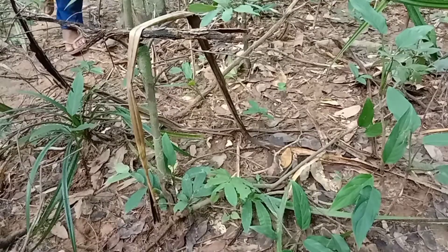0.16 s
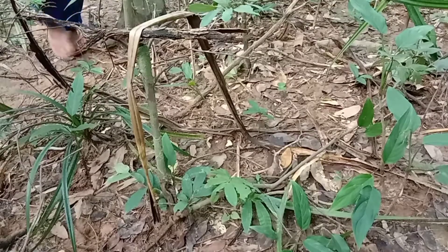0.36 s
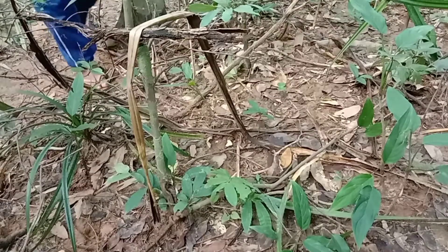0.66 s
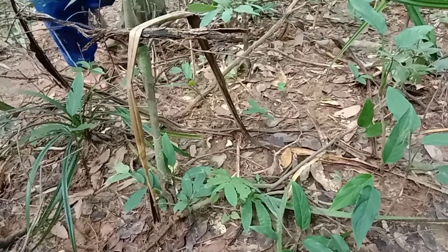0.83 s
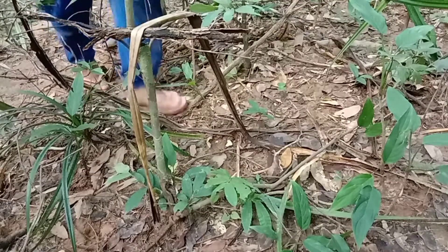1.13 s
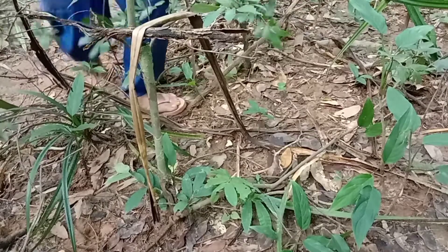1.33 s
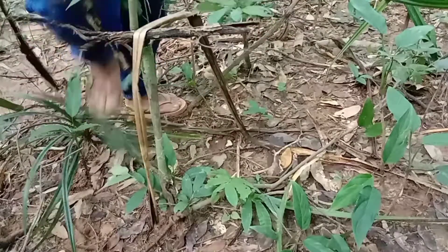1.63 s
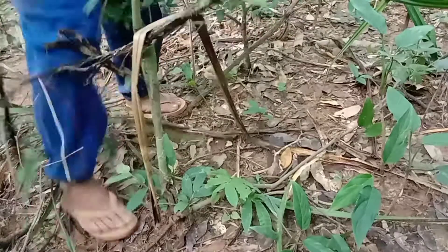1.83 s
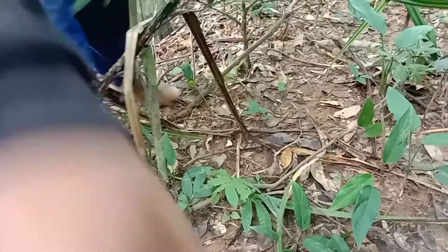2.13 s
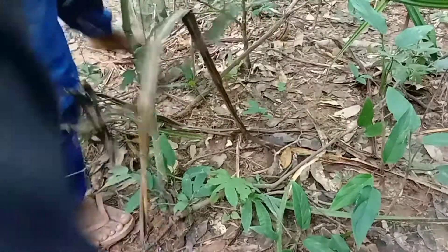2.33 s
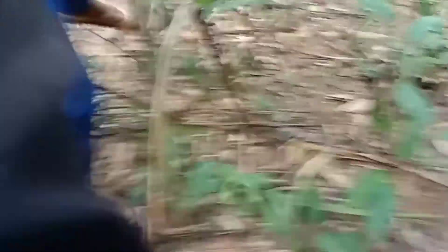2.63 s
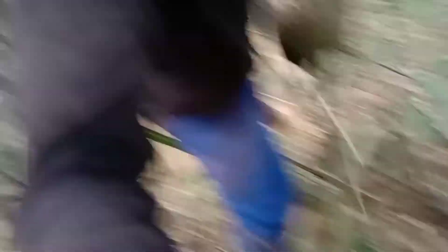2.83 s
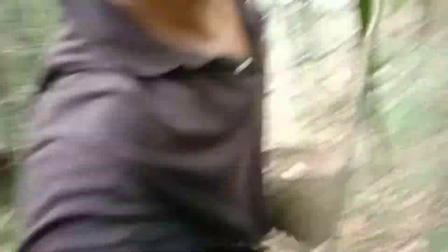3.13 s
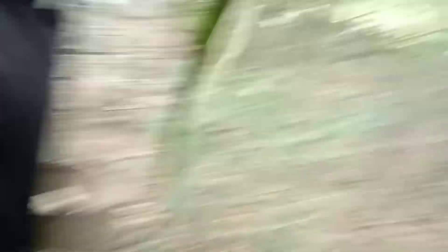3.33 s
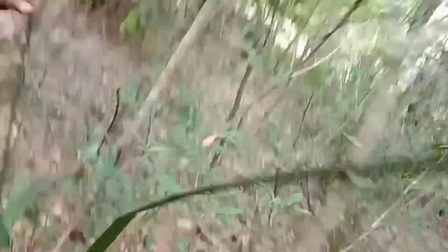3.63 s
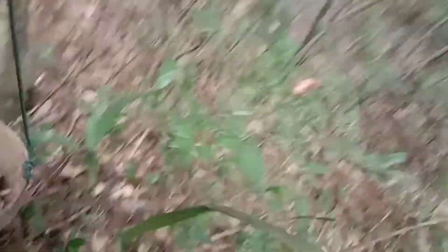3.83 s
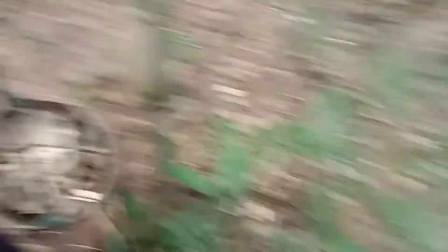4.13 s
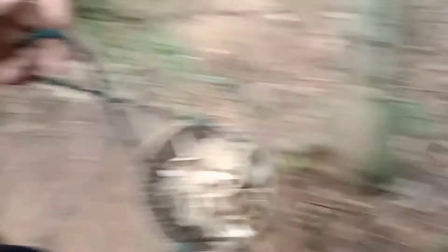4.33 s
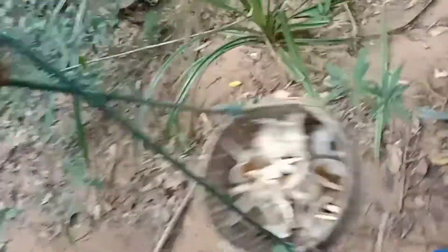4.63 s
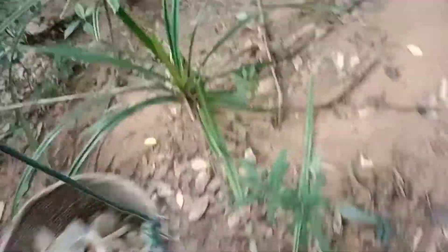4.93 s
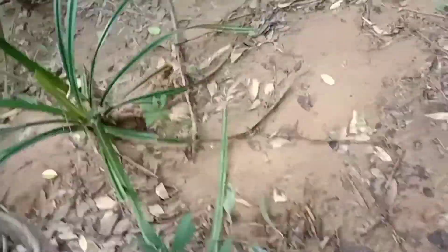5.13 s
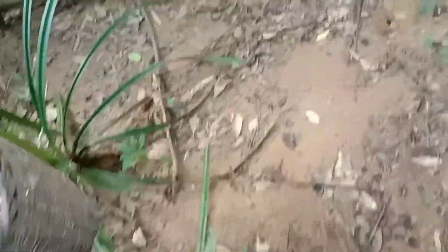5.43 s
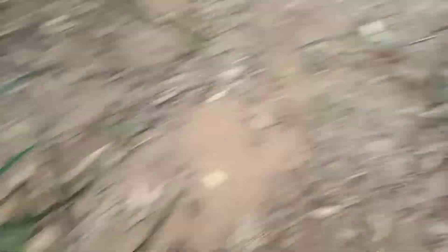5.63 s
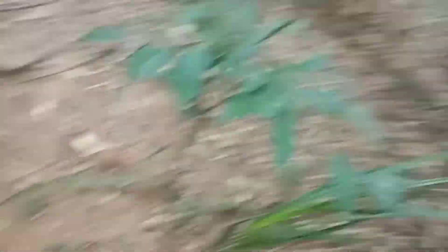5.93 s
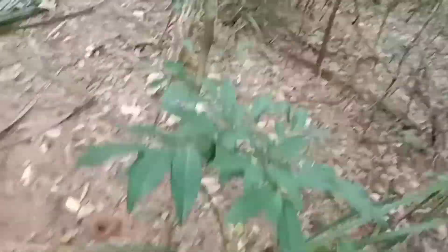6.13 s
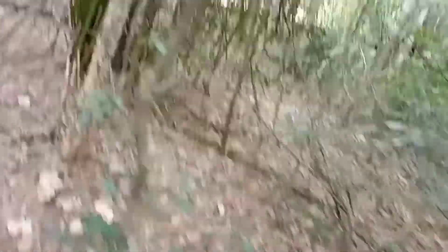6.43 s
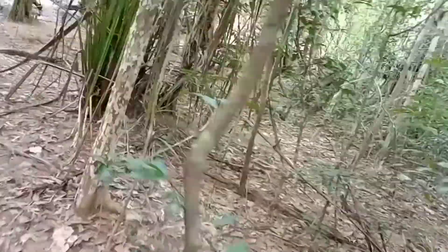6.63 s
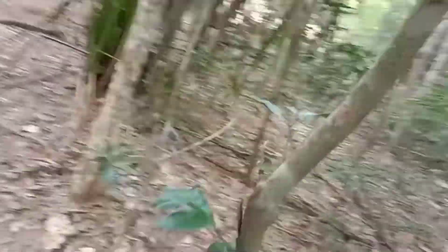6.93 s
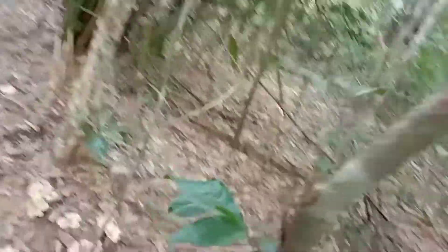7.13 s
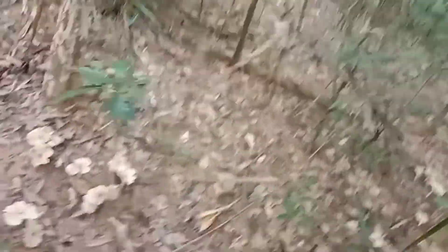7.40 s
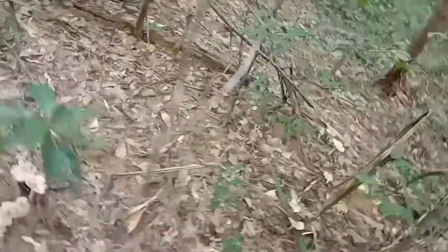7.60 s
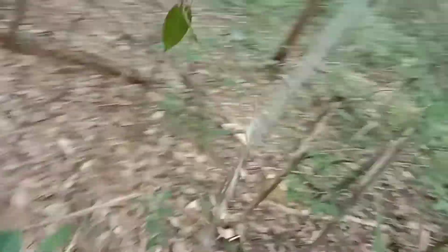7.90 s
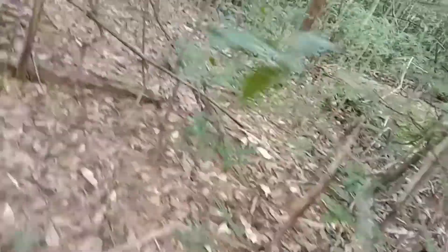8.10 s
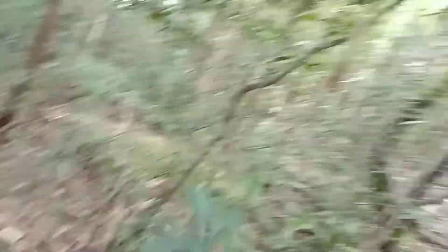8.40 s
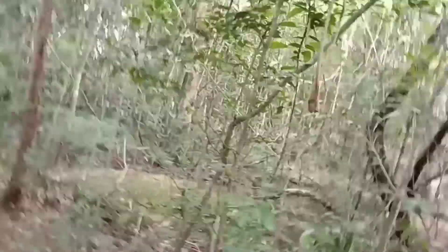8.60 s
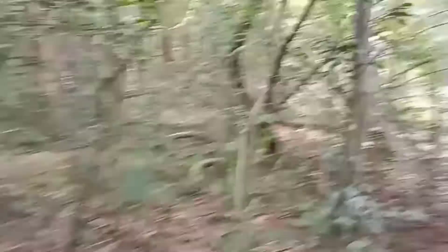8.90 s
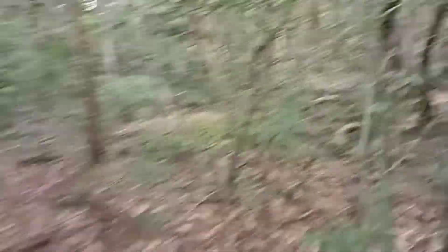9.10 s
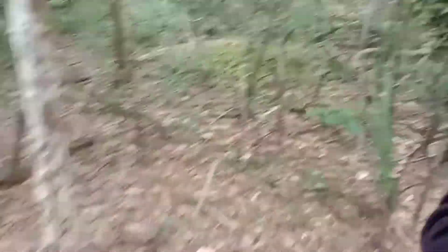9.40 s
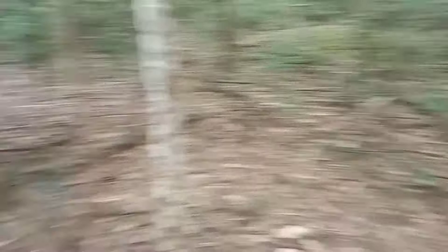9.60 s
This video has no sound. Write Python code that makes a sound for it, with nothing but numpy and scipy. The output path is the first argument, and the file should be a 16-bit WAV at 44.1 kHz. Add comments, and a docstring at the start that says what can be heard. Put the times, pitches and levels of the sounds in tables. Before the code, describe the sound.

Someone walks over crisp leaf litter, twigs cracking close by, while cicadas whine constantly and the small microphone is bumped and tapped.

```python
"""Footsteps over dry leaves and twigs in a forest, with a small microphone handled on the way.
From the start, shaped noise gives the forest air, narrow resonances blur into a cicada chorus near 5 kHz,
and flaring noise rustles. Soon noise bursts snap, short pitched blows knock and ping, dense crackle crunches
and narrow noise swells. Windowed cosines bump and lumpy rumble shifts, mostly from 2.7 s to 5 s; a tap rings
the casing at 3.35 s. From 8.16 s two noisy resonances fade in and sink in pitch."""
import sys
import numpy as np
from scipy import signal
from scipy.io import wavfile
from scipy.ndimage import uniform_filter1d

SR = 44100
rng = np.random.default_rng(int(sys.argv[2]) if len(sys.argv) > 2 else 0)


def unload_wav(signal):
    """Save mono or channel-first audio to the path in sys.argv[1] as 16-bit WAV at rate SR, clipped to [-1, 1]."""
    wavfile.write(
        sys.argv[1],
        SR,
        np.round(np.clip(np.atleast_2d(signal).T, -1, 1) * 32767).astype(np.int16),
    )


N = 429975

TICK_DB = -50  # mean level of the small leaf ticks, and the reference for how near a snap is


def gain_of(db):
    """Decibels to amplitude."""
    return 10 ** (np.asarray(db) / 20)


def evened(x):
    """Scales to rms 1."""
    return x / np.sqrt(np.mean(x ** 2) + 1e-20)


def along(table, column=1):
    """Draws one column of a curve table, with time in its first column, as a value at every sample."""
    rows = np.array(table)
    return np.interp(np.arange(N) / SR, rows[:, 0], rows[:, column])


def add(mix, s, sound):
    """Mixes a sound in at s seconds."""
    part = mix[max(round(s * SR), 0):][:len(sound)]
    part += sound[:len(part)]


def slow(seconds):
    """Random drift of rms 1 that changes over about that many seconds."""
    span = max(round(seconds * SR), 1)
    once = uniform_filter1d(rng.standard_normal(N), span)
    return evened(uniform_filter1d(once, span))


def bouts(rows, rise_db_per_s, fall_db_per_s):
    """Sums envelopes (start s, hold s, dB) that rise ahead of the start, hold and fall."""
    t = np.arange(N) / SR
    total = np.zeros(N)
    for s, hold, db in rows:
        rise = rise_db_per_s * np.maximum(s - t, 0)
        fall = fall_db_per_s * np.maximum(t - s - hold, 0)
        total += gain_of(db - rise - fall)
    return total


def no_bass(x, hz):
    """A steep high-pass."""
    return signal.sosfilt(signal.butter(4, hz, "high", fs=SR, output="sos"), x)


def resonate(x, hz, width):
    """Shifts hz (fixed or a curve) down to zero, smooths twice and shifts back: a steep resonance."""
    turn = np.exp(2j * np.pi * np.cumsum(hz * np.ones(len(x))) / SR)
    r = np.exp(-np.pi * width / SR)
    smooth = signal.lfilter([(1 - r) ** 2], [1, -2 * r, r * r], x / turn)
    return 2 * (turn * smooth).real


def coloured(x, points, patchy_db, size=512, span=(8, 10), smooth_hz=4500):
    """Gives x a spectrum that swells and fades in random patches of span bins by frames, less so in the treble."""
    swell_share = 0.79  # gaps go deeper than swells rise
    hz, _, z = signal.stft(x, SR, nperseg=size, noverlap=size * 3 // 4)
    chance = rng.standard_normal(z.shape[::-1]).T
    patches = evened(uniform_filter1d(uniform_filter1d(chance, span[0], 0), span[1], 1))
    patches = np.where(patches > 0, swell_share * patches, patches)
    depth = 0.28 + 1.07 / (1 + (hz / smooth_hz) ** 6)
    f, db = np.transpose(points)
    shape = np.interp(np.log(hz + 1), np.log(f + 1), db)
    z = z * gain_of(shape[:, None] + patchy_db * depth[:, None] * patches)
    return evened(signal.istft(z, nperseg=size, noverlap=size * 3 // 4)[1][:N])


def crackle(per_s, spread_db, t60, bed):
    """Noise that flares at each tiny break of a leaf and dies away, over a smooth bed."""
    strike = rng.random(N) < per_s / SR
    size = gain_of(spread_db * np.minimum(rng.exponential(1, N), 4)) * strike
    flares = signal.lfilter([1], [1, -gain_of(-60 / (t60 * SR))], size)
    return (bed + evened(flares)) * rng.standard_normal(N)


def forest_air():
    """The steady air of the forest: noise with a broad, patchy colour."""
    # Each row: frequency in Hz, relative level in dB per Hz.
    air_tone = [(18, -70), (35, -50), (70, -40), (220, -11.5), (450, -18), (620, -19.5), (800, -17.5),
                (1300, -23), (2150, -53), (3200, -13.5), (4250, -60), (5300, -8), (7700, -11), (11000, -21),
                (15000, -19.5)]
    return gain_of(-57) * coloured(rng.standard_normal(N), air_tone, 3.84, size=1024, span=(3, 18))


def cicadas():
    """Many singers blur into wavering noise within a few close, narrow resonances."""
    # The loudness of the drone. Each row: time in seconds, level in dB.
    chorus_level = [(0, -45), (.9, -44), (1.2, -47), (1.9, -44), (2.2, -44), (2.8, -45.5), (5, -43),
                    (6.1, -44.5), (8.3, -47.5), (9.75, -44.5)]
    # The resonances of the drone. Each row: pitch in Hz, width of each smoothing in Hz, relative level in dB.
    singers = [(4806, 102, -7), (4868, 62, -7.5), (4886, 98, -5.5), (5037, 24, -8), (4990, 49, -4.5)]
    waver_db, waver_s = 1, 0.062
    dip_db, dip_s = 2, 0.011  # the drone dips for moments
    chorus = np.zeros(N)
    for hz, width, db in singers:
        chorus += gain_of(db) * resonate(rng.standard_normal(N), hz, width)
    level = along(chorus_level) + waver_db * slow(waver_s) + dip_db * np.minimum(slow(dip_s), 0)
    return gain_of(level) * evened(chorus)


def rustle():
    """One stream of leaf breaks, stirred by feet, heard in four colours; dry ticks stand out of it."""
    # How hard the litter is stirred. Each row: time in seconds, crisp treble control in dB,
    # dull middle control in dB.
    stir = [(0.0, -52.5, -60), (0.46, -58, -65.5), (0.78, -52, -58.5), (1.11, -52, -61), (1.74, -49.5, -62),
            (1.87, -45.5, -44.5), (2.23, -46.5, -58.5), (2.8, -45, -59.5), (3.12, -52, -61),
            (3.58, -48.5, -58.5), (3.85, -51, -57.5), (4.53, -48, -50.5), (4.89, -49.5, -53),
            (5.26, -47, -57), (5.54, -49, -52.5), (6.08, -48.5, -53.5), (6.41, -53, -54.5),
            (7.44, -51, -53.5), (8.04, -54.5, -60), (9.75, -48.5, -49.5)]
    # Colours of the rustle, crispest first. Each row: frequency in Hz, relative level in dB per Hz.
    fizz_tone = [(6500, -75), (8500, 3), (10500, 8), (14800, 4.5), (16000, 23)]
    swish_tone = [(3500, -77), (5200, 13.5), (6500, 6.5), (8200, 2), (10000, -57), (16000, -21)]
    scrape_tone = [(1500, -85), (2300, -2), (2800, 5.5), (3300, 10), (3800, 7.5), (4300, -0.5), (6000, -11)]
    shuffle_tone = [(400, -6), (800, -8), (1300, 3), (1700, -0.5), (2300, -11), (3200, -33)]
    crisp_rest_db, dull_rest_db = -52, -58
    breaks = crackle(per_s=80, spread_db=5, t60=.06, bed=4.5)
    breaks = breaks + crackle(per_s=110, spread_db=4, t60=.008, bed=0) * 2.2  # dry ticks
    fizz = coloured(breaks, fizz_tone, 1.4, size=256)
    swish = coloured(breaks, swish_tone, 4.6, size=256)
    scrape = coloured(breaks, scrape_tone, 5.8, size=1024, span=(3, 18))
    shuffle = coloured(breaks, shuffle_tone, 4.6, size=1024, span=(3, 16))
    crisp = along(stir, column=1) - crisp_rest_db
    dull = along(stir, column=2) - dull_rest_db
    # each colour: its level at rest in dB, then dB per dB of control
    out = gain_of(-54.5 + 2.2 * crisp) * fizz
    out += gain_of(-57 + 1.22 * crisp) * swish
    out += gain_of(-62.5 + 0.9 * dull) * scrape
    out += gain_of(-62.5 + 0.72 * dull) * shuffle
    return out


def ticks(count=50):
    """Rows like those of the snaps, for small leaves at random moments."""
    middle_db, top_db, spread_db, t60_s = -14, -14, 4, .03
    when = rng.random(count) * N / SR
    a, b, c = spread_db * rng.standard_normal((count, 3)).T
    return list(zip(when, TICK_DB + a, middle_db + b, top_db + c, np.full(count, t60_s)))


def snaps():
    """A crack of a few milliseconds, then a gritty tail and a faint scatter from the trees ring the litter."""
    # Leaves and twigs that snap. Each row: start in seconds, level in dB, middle trim in dB,
    # top trim in dB, tail t60 in seconds (kept within 0.005 to 0.3 below).
    breakages = [(0.487, -48, -40, -8, 0.028), (0.513, -50, -36, -24, 0.038), (0.693, -27, -6, -9.5, 0.057),
                 (0.758, -33, 6, -17, 0.083), (1.201, -42, -26, -28, .055), (1.266, -43, -24, -15, 0.06),
                 (1.334, -33, -36, -22, 0.14), (1.372, -34, -28, -26, .048), (1.42, -32, 3.5, -26, 0.078),
                 (1.438, -33, -26, -20, 0.11), (1.465, -31, -6, -20, 0.073), (1.615, -30.5, -26, -32, .05),
                 (1.67, -30, -12, -11, 0.063), (1.6576, -26, -19, -26, 0.21), (1.7198, -36, -7, -25, 0.045),
                 (1.7926, -41, -30, 1, 0.039), (1.846, -27, -23, -22, 0.039), (1.857, -30, -20, -24, .04),
                 (1.8966, -23.5, -16, -15, 0.12), (1.927, -26, -13, -12, .08), (1.946, -34, -15, -18, .04),
                 (1.9541, -15, -5, -11.5, 0.097), (2.037, -24.5, -3, -14, 0.08), (2.049, -29, -8, -16, .06),
                 (2.103, -30.5, -24, -16, 0.043), (2.155, -38, -15, -15, 0.05),
                 (2.179, -29, -18, -25, .055), (2.196, -31.5, 5, -14, 0.11), (2.283, -34, -19, -20, .055),
                 (2.371, -36, -34, -11, 0.048), (2.4162, -32, -17, -12, 0.14), (2.471, -29, -17, -24, .055),
                 (2.4905, -29, -29, -20, .068), (2.515, -32, -30, -25, 0.05), (2.547, -47, -26, -4, 0.06),
                 (2.577, -32, -19, -17, 0.074), (2.599, -30, -20, -19, .04), (2.695, -36, -25, -21, .04),
                 (2.687, -34, -15, -24, .04), (2.707, -33, -20, -22, .04), (2.74, -38, -20, -9, 0.061),
                 (2.7485, -38, -20, -20, .03), (2.767, -35, -20, -16, .04), (2.788, -48, -14, -20, 0.036),
                 (2.9006, -35, -31, -16, 0.03), (2.931, -33, 6, -25, 0.094), (2.913, -34, -2, -24, .04),
                 (2.922, -34, -10, -22, .03), (2.9765, -40, -8, -21, 0.038), (3.005, -34, -30, -21, 0.17),
                 (3.055, -34.5, -30, -19, 0.061), (3.127, -37.5, -27, -21, 0.06),
                 (3.266, -31, -27, -33, 0.047), (3.336, -31, 5, -23, 0.096), (3.3505, -40, 15, -23, .08),
                 (3.363, -38, 8, -23, 0.1), (3.3867, -21.5, -8, -12, 0.043), (3.389, -28, 12, -21, 0.048),
                 (3.564, -36, -21, -15, .06), (3.591, -45, -16, -9, 0.1), (3.8906, -44, 0, -28, .055),
                 (4.114, -35, 3, -12, .055), (4.2065, -40, 8, -9, .06), (4.2273, -30, 10, -12.5, 0.086),
                 (4.242, -29, 5, -18, 0.062), (4.297, -31, -15, -15, 0.06), (4.366, -36, -24, -23, 0.045),
                 (4.385, -31.5, 10, -24, 0.15), (4.4167, -30.5, -3, -14, 0.038),
                 (4.4808, -26.5, 5, -24, 0.046), (4.5576, -27, 4, -12.5, .055),
                 (4.5784, -26.5, 5, -21, 0.28), (4.604, -32, -20, -13, .04),
                 (4.623, -16.5, -2, -13.5, 0.064), (4.726, -39, 8, -24, .055), (4.835, -41, -18, -15, .055),
                 (5.0135, -17.5, 8.5, -4, 0.018), (5.0693, -29.5, 9, -17, 0.089),
                 (5.271, -31, -35, -8.5, 0.041), (5.501, -44, 18, -22, .04), (6.0148, -18, 4.5, -23, 0.03),
                 (6.4653, -41, -21, -29, .055), (7.2773, -31, -25, -17, .04), (7.418, -49, -10, -6, .04),
                 (7.625, -37, 2, -23, 0.38), (8.2865, -38, 10, -16, 0.028), (8.499, -42, -22.5, -27, 0.028),
                 (8.92, -47, 21, -17, 0.051), (9.5204, -45, 8, -26, .055), (9.545, -28.5, -36, -19, 0.048)]
    # What a snap rings with: body, middle, edge and top. Each row: pitch in Hz,
    # width of each smoothing in Hz, trim in dB.
    litter = [(1590, 480, -7), (2940, 3400, -24.5), (6210, 4370, -11), (14300, 11500, 5)]
    build_s = .0007
    body_db, tail_db = -23.5, -1
    drier_db_per_db = 0.52  # the louder a snap, the nearer, and the less scatter against its level
    top_crack_db, top_scatter_db = -14, -4.5  # trims of crack and scatter in the top band alone
    out, t = np.zeros(N), np.arange(6000) / SR
    for s, db, middle_db, top_db, t60 in ticks() + breakages:
        noise, grit = rng.standard_normal((2, len(t)))
        crack = 1.3 * np.sign(noise) * gain_of(-60 * np.maximum(t - build_s, 0) / .004)
        splinters = gain_of(3 * evened(uniform_filter1d(grit, size=50)) - 1)  # the break runs on in fits
        tail = noise * gain_of(tail_db) * splinters * gain_of(-60 * t / np.clip(t60, .005, .3))
        scatter_db = tail_db - drier_db_per_db * (db - TICK_DB)
        scatter = noise * gain_of(scatter_db) * 1.24 * gain_of(-60 * t / 0.42)
        full = crack + tail + scatter
        top = gain_of(top_crack_db) * crack + tail + gain_of(top_scatter_db) * scatter
        trims_db = (body_db, middle_db, 0, top_db)
        for drive, trim_db, (hz, width, band_db) in zip((full, full, full, top), trims_db, litter):
            band = resonate(drive * np.minimum(t / build_s, 1), hz, width)
            band = band * np.sqrt(SR / width / 3)  # makes up for the noise a narrow band loses
            add(out, s, gain_of(db + trim_db + band_db) * band)
    return out


def knocks():
    """A short blow rings at one pitch, from dull knock to high ping."""
    # Short pitched knocks and high pings, many at the onset of a snap. Each row: start in seconds,
    # level in dB, pitch in Hz, t60 in seconds.
    blows = [(0.4868, -28.5, 6370, 0.0018), (.4866, -31, 14600, .003), (.5139, -30.5, 6500, 0.0016),
             (0.6924, -29, 14400, 0.0046), (.7586, -36, 6100, .003), (1.273, -44, 12000, 0.0037),
             (1.3355, -33, 6700, .004), (1.465, -45, 3120, 0.027), (1.657, -25, 5700, .003),
             (1.684, -30, 7040, .003), (1.658, -41, 3300, .02), (1.716, -35.5, 1090, 0.034),
             (1.792, -17, 15300, 0.006), (1.7922, -27, 7540, 0.0031), (1.8478, -30, 5700, .003),
             (1.849, -35, 2060, 0.013), (1.897, -30, 5840, 0.0024), (1.8966, -34, 3570, 0.005),
             (1.926, -38, 2900, .012), (1.954, -43, 1500, 0.016), (1.954, -38, 1940, 0.032),
             (1.954, -43, 2900, 0.023), (1.965, -35, 1330, 0.037), (1.9546, -13, 14700, .006),
             (1.9655, -25, 7900, .006), (1.967, -34, 5570, .008), (2.0357, -23, 14500, 0.0045),
             (2.327, -44, 3100, 0.0093), (2.3725, -32, 5750, .003), (2.374, -43, 4300, 0.014),
             (2.4275, -40, 3360, .008), (2.472, -35, 2680, 0.005), (2.626, -41, 3600, .008),
             (2.5145, -32, 10000, .002), (2.546, -29, 8000, .0015), (2.788, -28, 5200, 0.0023),
             (2.828, -38, 3320, .003), (2.902, -28, 8000, 0.0011), (3.337, -33, 4450, 0.011),
             (3.338, -40, 3500, .01), (3.338, -45, 2050, .01), (3.341, -26, 4640, 0.0059),
             (3.3503, -13.5, 1205, 0.0073), (3.3503, -36, 3750, 0.0072), (3.3505, -35, 2470, 0.012),
             (3.3505, -39, 2800, 0.011), (3.358, -37, 1400, 0.02), (3.356, -39, 690, 0.048),
             (3.37, -39, 1150, 0.1), (3.363, -37, 3100, 0.012), (3.3853, -19.5, 7940, 0.0022),
             (3.388, -33, 1450, 0.006), (3.394, -39, 1110, 0.012), (3.392, -31, 3000, 0.0024),
             (3.3954, -31, 2600, 0.002), (4.113, -43, 3070, 0.021), (4.337, -42, 3830, .004),
             (4.3665, -28, 5760, .002), (4.481, -42.5, 780, 0.088), (4.4812, -31, 3000, 0.0072),
             (4.558, -38, 5800, .004), (4.562, -36, 1430, 0.02), (4.621, -34, 2880, 0.02),
             (5.0129, -8.5, 1520, 0.0049), (5.013, -30.5, 870, 0.02), (5.0148, -21, 2620, .003),
             (5.0137, -17, 4970, 0.0044), (5.0137, -23, 3600, 0.0031), (5.0134, -17, 13400, 0.0037),
             (5.0143, -20, 7700, .003), (5.019, -34, 1630, 0.019), (5.14, -36, 1200, 0.013),
             (5.172, -41.5, 1600, .025), (5.44, -47, 2600, 0.013), (6.0151, -27, 1450, 0.0069),
             (6.015, -27, 5500, 0.0045), (6.0152, -40, 3560, .003), (6.0152, -41, 2500, .003),
             (6.023, -43, 1400, 0.017), (7.171, -45, 3040, 0.02), (7.277, -32.5, 8100, 0.017),
             (7.288, -42, 8100, .015), (7.418, -44, 3080, 0.029), (7.421, -41, 3900, 0.012),
             (8.287, -30.5, 6200, .003), (8.399, -45.5, 1650, .015), (8.923, -32.5, 2670, 0.0043),
             (9.473, -42, 3600, 0.018), (9.648, -33.5, 1560, 0.0043)]
    clean_s = .011
    out, t = np.zeros(N), np.arange(4000) / SR
    clean = np.exp(-t / clean_s)  # the ring starts purer and turns rough
    for s, db, hz, t60 in blows:
        rough = evened(resonate(rng.standard_normal(len(t)), hz, 0.22 * hz))
        ring = clean * np.sin(2 * np.pi * hz * t) + (0.18 + .5 * (1 - clean)) * rough
        u = t / np.clip(t60, .001, .3) * np.log(1000) * 3 / 2
        swell = u * np.exp(1 - u)  # the blow builds up, then the ring dies
        add(out, s, gain_of(db) * swell * ring)
    return out


def crunches():
    """A foot settles into the litter: hundreds of small breaks a second while the weight comes down."""
    # Each row: start in seconds, hold in seconds, treble level in dB, middle level in dB.
    settling = np.array([(0.68, 0.18, -67, -58), (1.325, 0.18, -52, -55.5), (1.652, 0.058, -48, -48.5),
                         (1.811, 0.17, -39.5, -49.5), (2.035, 0.051, -49, -48.5), (2.41, 0.21, -54, -52.5),
                         (2.685, 0.17, -53, -52), (2.916, 0.055, -46, -46.5), (3.534, 0.11, -62, -55.5),
                         (4.188, 0.23, -49, -52), (4.558, 0.21, -52, -50.5), (5.036, 0.17, -56, -52),
                         (5.237, 0.11, -49.5, -54), (5.983, 0.058, -67, -47.5), (9.45, 0.11, -49.5, -54.5)])
    # Colours of treble and middle. Each row: frequency in Hz, relative level in dB per Hz.
    crisp_tone = [(3500, -15), (5000, 14), (7500, 1), (9500, -6.5), (15500, -23)]
    gritty_tone = [(700, -60), (1400, 3.5), (2200, -3.5), (3300, 8.5), (4600, -0.5), (6000, -5)]
    rise_db_per_s, fall_db_per_s = 900, 305
    breaks = crackle(per_s=300, spread_db=5, t60=.005, bed=.9)
    drag = crackle(per_s=120, spread_db=4.5, t60=.015, bed=1.8)  # the middle scrapes more than it cracks
    treble = coloured(breaks, crisp_tone, 4.2, size=256)
    middle = coloured(drag, gritty_tone, 4.7, size=512, span=(2, 18))
    treble_level = bouts(settling[:, [0, 1, 2]], rise_db_per_s, fall_db_per_s)
    middle_level = bouts(settling[:, [0, 1, 3]], rise_db_per_s, fall_db_per_s)
    return treble_level * treble + middle_level * middle


def swells():
    """Short, soft swells of narrow noise, each in one resonance."""
    # Each row: middle of the swell in seconds, level in dB, pitch in Hz.
    narrow_swells = [(.724, -56.5, 990), (1.368, -58.5, 984), (1.484, -59.5, 513), (1.678, -61, 2270),
                     (1.685, -59.5, 540), (1.722, -57, 236), (1.726, -55, 1080), (1.82, -65, 1080),
                     (1.876, -54, 1720), (1.887, -49, 2060), (1.9, -54, 1520), (1.94, -53, 1110),
                     (1.985, -51, 1700), (1.995, -58, 600), (2.069, -52, 1317), (2.453, -59, 1990),
                     (2.6, -58.5, 1480), (2.701, -58, 1145), (2.944, -62, 1240), (3.375, -57, 2700),
                     (3.385, -56, 647), (3.577, -58.5, 516), (3.63, -60, 2020), (3.949, -57.5, 1930),
                     (4.239, -56.5, 860), (4.241, -57, 1790), (4.398, -63, 2000), (4.5, -63, 700),
                     (4.54, -57, 1114), (4.644, -58.5, 650), (4.639, -57, 1380), (4.734, -61, 1250),
                     (4.737, -58, 2000), (4.742, -61, 1680), (5.04, -53, 1305), (5.04, -56, 950),
                     (5.045, -55, 1700), (5.05, -57, 2150), (5.09, -58, 1250), (5.138, -57, 986),
                     (5.157, -55.5, 1620), (5.329, -59.5, 760), (5.427, -59, 238), (5.95, -59.5, 227),
                     (6.042, -51, 1350), (6.091, -55.5, 1300), (6.23, -58, 1430), (6.46, -59, 1360),
                     (6.49, -62, 525), (6.745, -56, 620), (6.821, -57, 1056), (7.118, -57, 593),
                     (7.301, -57, 880), (7.499, -60, 1350), (7.632, -59.5, 1083), (8.786, -64, 427),
                     (8.86, -58, 1147), (9.2, -61, 1134), (9.27, -62, 1100), (9.52, -53, 990),
                     (9.644, -60, 1610), (9.675, -60, 1980)]
    length_s = .14
    out, envelope = np.zeros(N), np.hanning(round(length_s * SR))
    for s, db, hz in narrow_swells:
        tone = resonate(rng.standard_normal(SR // 2), hz, 70 + 0.032 * hz)
        add(out, s - length_s / 2, gain_of(db) * envelope * evened(tone[:len(envelope)]))
    return out


def handling():
    """Lumpy casing rumble swells, holds and fades with each shift of grip; single soft bumps are short cosines."""
    # Hands shifting on the casing. Each row: start in seconds, rumble level in dB, hold in seconds.
    shifts = [(2.748, -49, 0.015), (2.966, -46.5, 0.0098), (3.22, -59, 0.036), (3.364, -46, 0.0075),
              (3.54, -55, 0.046), (3.64, -44, 0.0092), (3.72, -49, 0.042), (3.86, -33.5, 0.011),
              (4.018, -43.5, 0.009), (4.084, -44.5, 0.025), (4.207, -46.5, 0.13), (4.538, -41, 0.0095),
              (4.65, -44, 0.063), (4.766, -54.5, 0.0084), (5.03, -68, .01), (5.96, -70, .01),
              (6.813, -72, 0.0099), (7.658, -69, 0.12), (7.996, -68, 0.085), (8.326, -64, 0.015),
              (8.459, -57.5, .02), (8.65, -63, 0.036), (8.85, -67, 0.0093), (9.298, -50, 0.018)]
    # Colour of the rumble. Each row: frequency in Hz, relative level in dB per Hz.
    rumble_tone = [(20, -46), (45, 0.5), (90, 7), (150, -4), (230, -13.5), (320, -60)]
    # Bumps through the ground and then on the casing. Each row: start in seconds, peak in dB, pitch in Hz.
    bumps = [(0.687, -48.5, 144), (1.348, -58, 186), (1.938, -49, 193), (2.045, -49.5, 97),
             (2.721, -35, 97), (2.905, -39.5, 112), (2.956, -45, 103), (3.349, -39, 144), (3.55, -39, 91),
             (3.588, -43, 110), (3.626, -31, 110), (3.639, -32, 96), (3.668, -43, 85), (3.709, -38, 94),
             (3.752, -38, 95), (3.838, -20, 102), (3.883, -38, 110), (3.933, -26, 136), (3.97, -26, 96),
             (3.997, -31, 109), (4.063, -37, 96), (4.08, -36, 130), (4.126, -42, 90), (4.257, -40, 77),
             (4.514, -30, 98), (4.651, -32.5, 95), (4.665, -34, 105), (4.687, -31, 93.6), (7.682, -60, 73),
             (8.453, -48, 64), (8.947, -54, 72), (9.286, -42.5, 74)]
    rise_db_per_s, fall_db_per_s, rest_db = 349, 348, -91.5
    bump_cycles = 3.43
    lumps = crackle(per_s=30, spread_db=3, t60=.15, bed=.6)
    grip = gain_of(rest_db) + bouts([(s, hold, db) for s, db, hold in shifts], rise_db_per_s, fall_db_per_s)
    out = grip * coloured(lumps, rumble_tone, 0.99, size=2048, span=(3, 3))
    for s, db, hz in bumps:
        turns = np.arange(round(bump_cycles / hz * SR)) * hz / SR
        window = np.hanning(len(turns)) ** 2.04
        add(out, s, -gain_of(db) * window * np.cos(2 * np.pi * (turns - turns[-1] / 2)))
    return out


def tap():
    """One hard blow sets all casing modes ringing, with a loose rattle."""
    # What the casing rings with. Each row: pitch in Hz, relative level in dB, t60 in seconds.
    casing = [(154.4, -7, 0.16), (354, -3.5, 0.065), (660, 2, 0.036), (940, -6, 0.08), (1090, 0, 0.047),
              (1307, 0, 0.086), (1540, 0, 0.065), (1640, -1, 0.062)]
    start_s, level_db, attack_s = 3.3505, -27.5, 0.00038
    out, t = np.zeros(N), np.arange(8000) / SR
    ring = sum(gain_of(db - 60 * t / t60) * np.sin(2 * np.pi * hz * t) for hz, db, t60 in casing)
    rattle = 1 + 0.37 * evened(uniform_filter1d(rng.standard_normal(len(t)), size=40))
    add(out, start_s, gain_of(level_db) * ring * rattle * np.minimum(t / attack_s, 1))
    return out


def swing():
    """Air noise in two sinking, wandering resonances, the upper one fainter."""
    start_s, rise_s, level_db, waver_db = 8.16, 1, -59.5, 1
    start_hz, sink_hz_per_s, wander_hz = 1280, 174, 30
    upper_hz, upper_db = 334, -2.5  # the second resonance against the first
    since = np.maximum(np.arange(N) / SR - start_s, 0)
    hz = start_hz - sink_hz_per_s * since + wander_hz * slow(0.078)
    level = np.minimum(since / rise_s, 1) * gain_of(level_db + waver_db * slow(0.096))
    low, high = rng.standard_normal((2, N))
    lower = evened(resonate(low, hz, 80))
    upper = evened(resonate(high, hz + upper_hz, 250))
    return level * (lower + gain_of(upper_db) * upper)


def scene():
    """Everything reaches one microphone; snaps and knocks have no bass."""
    litter = rustle() + no_bass(snaps() + knocks(), 594) + crunches()
    thinned = no_bass(forest_air() + litter + swells() + swing(), 103)
    return (thinned + cicadas() + handling() + tap())[None]


def record(dry):
    """The small microphone loses the deepest bass; then a steep low-pass limits the band."""
    edge_hz = 15580
    thin = signal.sosfilt(signal.butter(2, 45, "high", fs=SR, output="sos"), dry)
    low_pass = signal.firwin(801, edge_hz, window=("kaiser", 10), fs=SR)
    return signal.oaconvolve(thin, low_pass[None], "same", axes=1)


dry = scene()
out = record(dry)
unload_wav(out)
```